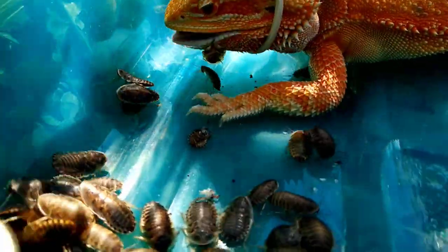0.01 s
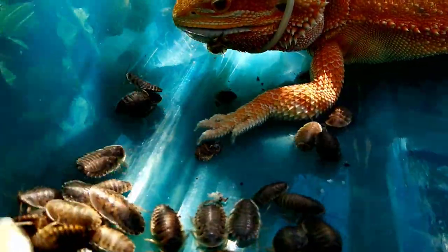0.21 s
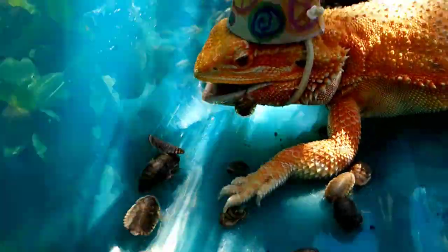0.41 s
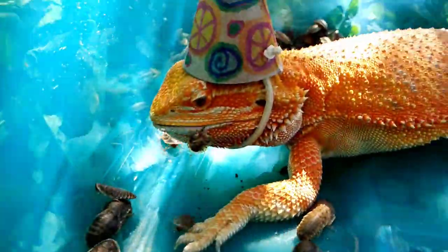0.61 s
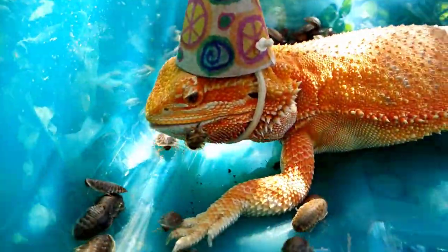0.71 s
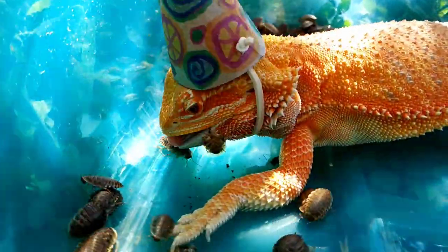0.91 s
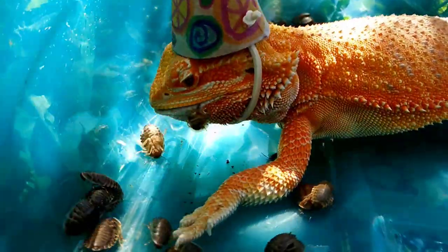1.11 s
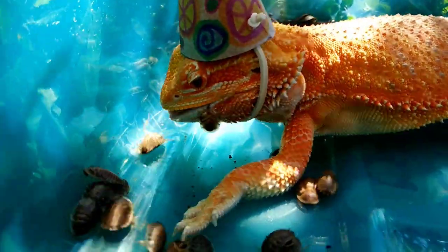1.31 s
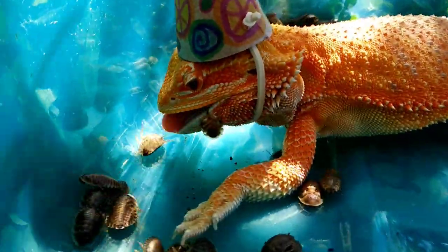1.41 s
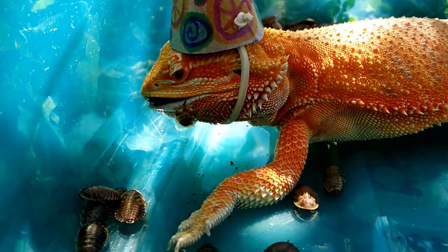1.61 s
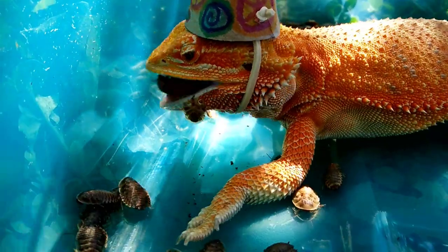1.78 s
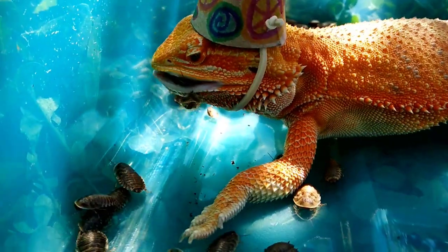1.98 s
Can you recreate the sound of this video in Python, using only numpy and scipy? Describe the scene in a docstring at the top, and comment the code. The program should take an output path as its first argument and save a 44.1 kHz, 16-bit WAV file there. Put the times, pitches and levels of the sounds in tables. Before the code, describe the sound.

A lizard crunches insects in a plastic tub: bright clicks, scrapes and dull knocks crowd together early, a near-silent lull, a shorter second cluster, then a faint rustle; close stereo microphone, quiet room with soft hiss.

```python
"""Two seconds in stereo, hand-held camera close over a plastic tub where a lizard eats insects in a quiet room.
Room hiss, low handling rumble and a faint rustle come first: coloured noise under drawn levels.
From 0.2 s soft scrapes (noise puffs), dull knocks (damped sines, mostly louder right) and bright ticks
(ringing snaps) crowd in until 0.75 s, with a brief hollow hum near 0.3 s and rubbing in mid-range noise.
A lull follows, a second cluster at 1.2 to 1.4 s, then a few knocks and a rustle rising at the end."""
import sys
import numpy as np
from scipy import signal
from scipy.fft import rfft, irfft, next_fast_len
from scipy.io import wavfile
from scipy.ndimage import map_coordinates

SR = 44100
rng = np.random.default_rng(int(sys.argv[2]) if len(sys.argv) > 2 else 0)


def bounce(signal):
    """Save signal as a 16-bit WAV file at the path given by the first command-line argument."""
    frames = np.transpose(np.atleast_2d(signal))
    limited = np.clip(frames, -1, 1)
    pcm = np.round(limited * 32767).astype(np.int16)
    wavfile.write(sys.argv[1], SR, pcm)


N = 88200

# In every table and setting, a left-right level above 0 dB is louder on the left.
# Level of the bass handling rumble: start_s, level_db
RUMBLE_LEVEL = [(0, -59), (.22, -62), (.3, -40.5), (.37, -55), (.46, -44.5), (.62, -47.5), (.76, -56.5),
                (.92, -59.5), (1.0, -63), (1.22, -62.5), (1.3, -48.5), (1.45, -60), (2, -58)]
# Level of the treble rustle: start_s, level_db
RUSTLE_LEVEL = [(0, -63.5), (.23, -68), (.24, -35), (.26, -43.5), (.31, -49.5), (.39, -63.5), (.5, -55.5),
                (.58, -56), (.68, -59.5), (.8, -68), (1.1, -70), (1.32, -66.5), (1.34, -56), (1.45, -64),
                (1.55, -70.5), (1.64, -57.5), (1.75, -70), (1.96, -64.5), (2, -52.5)]
# Level of the mid-range rubbing: start_s, level_db
SCUFF_LEVEL = [(0, -86), (.21, -68), (.24, -64), (.35, -61), (.42, -69.5), (.45, -43), (.48, -61.5),
               (.53, -45), (.6, -47.5), (.66, -41.5), (.7, -57.5), (.74, -44.5), (.78, -61.5), (.95, -81),
               (1.17, -66.5), (1.25, -62.5), (1.265, -45), (1.32, -55.5), (1.38, -64), (1.5, -75.5),
               (2, -70.5)]
# Relative colour of the room air: frequency_hz, density_db (per Hz)
ROOM_COLOUR = [(120, -45), (220, -4), (450, -3), (600, -5), (770, 3), (950, -9), (1700, -13.5), (3000, -11),
               (5300, -9.5), (6900, -9.5), (8000, -33), (8800, -22.5), (9800, -39.5)]
# Relative colour of the rumble: frequency_hz, density_db (per Hz)
BASS_COLOUR = [(25, -48.5), (50, -2), (86, 0.5), (150, -5.5), (200, -5.5), (350, -30), (600, -73.5)]
# Relative colour of the rustle: frequency_hz, density_db (per Hz)
TREBLE_COLOUR = [(900, -40), (1600, -20), (2600, -11), (4100, -6), (5200, -1), (6400, -7.5), (7300, -18.5),
                 (8000, -33), (8800, -42.5), (9800, -89)]
# Relative colour of the rubbing: frequency_hz, density_db (per Hz)
MIDDLE_COLOUR = [(100, -18), (250, 5.5), (500, 1.5), (1300, -2), (2200, -8), (3500, -13), (6000, -40)]
# Likeness of the two microphones in the noise layers: frequency_hz, correlation (-1 to 1)
LIKENESS = [(60, 0.73), (250, 0.8), (520, 0.59), (1100, 0.0052), (2200, -0.28), (9000, 0.12)]
# Soft scrapes: start_s, level_db (peak), centre_hz, left_right_db, t60_s (time to fall 60 dB)
SCRAPE_EVENTS = [(0.167, -48, 2840, 10, 0.09), (0.221, -40.5, 3060, 8.5, 0.072),
                 (.261, -37, 4600, 6, 0.025), (0.277, -38, 5040, 5, 0.055), (0.565, -34, 6800, 4.5, 0.018),
                 (0.736, -49, 2980, 10, .02), (1.173, -48.5, 3370, 10, 0.051),
                 (1.2591, -30, 2350, 0.5, .025), (1.424, -49.5, 5570, -19, 0.077),
                 (1.991, -43.5, 4600, -2, 0.051)]
# Dull knocks: start_s, level_db (peak), pitch_hz, left_right_db, decay_cycles (to fall 30 dB)
KNOCK_EVENTS = [(0.222, -50, 1380, 5, 55), (0.297, -42.5, 1380, -13, 6.3), (0.392, -36, 605, 17.5, 5.1),
                (.391, -26, 123.6, 2, 2.94), (0.444, -41, 418, -9, 6), (0.454, -34.5, 1340, 19, 0.49),
                (.448, -30.5, 105, -8, 0.86), (0.5213, -13, 1025, -57, 0.3), (0.521, -38.5, 213, 14, 1.2),
                (.585, -29, 542, -16, 2.1), (0.588, -32, 104, -23, 1.7), (0.6528, -27, 402, -7.5, 1.8),
                (0.7187, -16.5, 777, -6, 1.7), (0.7183, -24, 339, -4, 3.6), (1.205, -46.5, 683, 24, 6.1),
                (1.243, -42.5, 1220, -5, 2.5), (1.26, -33.5, 470, -15, 9.2),
                (1.3334, -21.5, 685, -19.5, 1.33), (1.3327, -29, 1540, -15.5, 1.5),
                (1.338, -37.5, 68.5, -13, 0.79), (1.655, -47, 85, -17, 2.2), (1.965, -37, 547, -27, 0.82)]
# Bright ticks: start_s, level_db (peak), centre_hz, left_right_db, width_ratio (one resonance's width over centre)
TICK_EVENTS = [(.2364, -23, 5600, 0, .3), (.2381, -28, 3300, 3, 1.4), (.246, -21, 5300, .5, .35),
               (.2502, -34, 4500, 3, .4), (.2978, -24, 5200, 5, .14), (.4536, -27, 3300, -12, .9),
               (.457, -32, 5060, 24, .5), (.5226, -30, 4280, -39, .8), (.6535, -24, 5200, 15, .6),
               (.6546, -23, 3300, 10, .8), (.7192, -29, 6300, 15, .3), (.72, -35, 3000, 10, .4),
               (.912, -45, 6070, -11, .2), (1.1095, -47, 4400, 11.5, .3), (1.1475, -48, 5850, -21, .12),
               (1.278, -42, 2500, -5, .6), (1.3338, -24, 4500, -15, .4), (1.3815, -38, 5860, -26, .15)]

ROOM_DB, ROOM_LEFT_RIGHT_DB = -63.5, -0.5
RUMBLE_LEFT_RIGHT_DB, SCUFF_LEFT_RIGHT_DB = -6.0, -11
GRAINS_PER_S, GRAIN_SPREAD_DB = 900, 4  # on each side; scatter of the grain levels
RUSTLE_GRAIN_DB, SCUFF_GRAIN_DB = 5, 4  # grains against the noise under them
SCRAPE_RISE_S, SCRAPE_WIDTH_RATIO = 0.00082, 0.56  # time constant of the start; one resonance's width over centre
KNOCK_LEFT_LAG_S, TICK_RIGHT_LAG_S = 0.00064, 0.000412  # late arrival at one microphone
ONSET_POWER = 3.2  # how softly a knock grows over its first cycle
SAG_RATIO, SAG_S = 0.6, 0.012  # a deep knock starts this share sharp and settles with this time constant
CRACK_DB, CRACK_T60_S = -17, 0.006  # splinters after the blow
TAIL_DB, TAIL_T60_S = -32, 0.04  # longer scatter after the blow
BROAD_DB = -26  # share of a tick that skips its own resonance
SWELL_HZ, SWELL_WIDTH_HZ, SWELL_DB = 790, 150, -58
PORT_HZ, PORT_WIDTH_HZ, PORT_DB = 4000, 190, 4.5  # ring of the microphone port
ROLLOFF_HZ, SHELF_DB = 6680, -15  # steep dulling of ticks and scrapes, and the share added at all frequencies
LOW_CUT_HZ, TOP_HZ = 58, 9850


def amp(db):
    """Amplitude ratio of a level in dB."""
    return 10 ** (np.asarray(db) / 20)


def unit(x):
    """The signal scaled to rms 1."""
    return x / np.sqrt(np.mean(x ** 2) + 1e-20)


def along(points, hz):
    """Values read between (Hz, value) points on a log frequency axis."""
    f, v = np.transpose(points)
    return np.interp(np.log(hz + 1), np.log(f + 1), v)


def level_curve(rows):
    """Gain for each sample from (time, dB) points joined in dB."""
    start_s, level_db = np.transpose(rows)
    return amp(np.interp(np.arange(N) / SR, start_s, level_db))


def wobble(rate):
    """A smooth random curve with this many knots a second."""
    knots = rng.standard_normal(int(N * rate / SR) + 4)
    return map_coordinates(knots, [np.arange(N) * rate / SR])


def noise():
    """Unrelated white noise for the two microphones."""
    return rng.standard_normal((2, N))


def filtered(x, response):
    """The signal shaped by a complex response of frequency."""
    n = x.shape[-1]
    m = next_fast_len(n + 4096)
    return irfft(rfft(x, m) * response(np.fft.rfftfreq(m, 1 / SR)), m)[..., :n]


def delays(f, left_s, right_s):
    """Phase response that delays each side by its own time."""
    return np.exp(-2j * np.pi * f * np.array([[left_s], [right_s]]))


def peak(f, hz, width_hz):
    """A causal resonance with gain 1 at its centre."""
    return 1j * f * width_hz / (hz * hz - f * f + 1j * f * width_hz)


def port(f):
    """The microphone port's ring and the dull top, heard on ticks and scrapes."""
    ring = 1 + amp(PORT_DB) * peak(f, PORT_HZ, PORT_WIDTH_HZ)
    dull_top = amp(SHELF_DB) + 1 / (1 + (f / ROLLOFF_HZ) ** 30)
    return ring * dull_top


def sides(left_right_db):
    """Left and right gains, as a column, for a level difference; their mean is 1."""
    gains = amp(np.array([left_right_db / 2, -left_right_db / 2]))
    return (gains / gains.mean())[:, None]


def place(out, sound, start, level_db, left_right_db):
    """Add a sound at a sample, its highest peak set to 1 before level and side gains."""
    gain = amp(level_db) * sides(left_right_db)
    out[:, start:][:, :sound.shape[-1]] += gain * sound / np.abs(sound).max()


def rush(colour, source):
    """Two unrelated signals coloured and made partly alike, rms 1."""
    def response(hz):
        # the angle between the two sides sets their correlation
        half_angle = np.arccos(np.clip(along(LIKENESS, hz), -1, 1)) / 2
        return amp(along(colour, hz)) * [np.cos(half_angle), np.sin(half_angle)]

    mid, side = filtered(source, response)
    return unit(np.array([mid + side, mid - side]))


def grains(t60):
    """Tiny noise bursts at random times, each dying exponentially, rms 1."""
    struck = rng.random((2, N)) < GRAINS_PER_S / SR
    hits = struck * amp(GRAIN_SPREAD_DB * noise())
    fade = amp(-60 * np.arange(SR // 50) / SR / t60)
    envelope = signal.fftconvolve(hits, fade[None], axes=1)[:, :N]
    return unit(envelope * noise())


def room_air():
    """Air of the room: coloured noise whose level drifts unevenly."""
    drift = amp(2.4 * wobble(12.7))
    return amp(ROOM_DB) * sides(ROOM_LEFT_RIGHT_DB) * rush(ROOM_COLOUR, drift * noise())


def rumble():
    """Lumpy handling rumble: bass noise with a wandering level, louder on the right."""
    lumps = amp(2.35 * wobble(13.75))
    bass = unit(lumps * rush(BASS_COLOUR, noise()))
    return level_curve(RUMBLE_LEVEL) * sides(RUMBLE_LEFT_RIGHT_DB) * bass


def rustle():
    """Treble rustle: hiss with tiny random grains."""
    hiss = noise() * amp(1.15 * wobble(31.0))
    source = hiss + amp(RUSTLE_GRAIN_DB) * grains(0.014)
    return level_curve(RUSTLE_LEVEL) * rush(TREBLE_COLOUR, source)


def scuff():
    """Gritty rubbing on the body: uneven mid-range noise and grains, louder on the right."""
    rubbing = amp(1.2 * wobble(30)) * noise()
    source = rubbing + amp(SCUFF_GRAIN_DB) * grains(0.01)
    return level_curve(SCUFF_LEVEL) * sides(SCUFF_LEFT_RIGHT_DB) * rush(MIDDLE_COLOUR, source)


def scrapes():
    """Resonant noise that starts softly and dies fast, different at each microphone."""
    out, t = np.zeros((2, N + SR)), np.arange(SR // 10) / SR
    for start_s, level_db, hz, left_right_db, t60 in SCRAPE_EVENTS:
        crackle = np.sign(rng.standard_normal((2, len(t))))
        puff = crackle * (1 - np.exp(-t / SCRAPE_RISE_S)) * amp(-60 * t / t60)
        puff = filtered(puff, lambda f: peak(f, hz, SCRAPE_WIDTH_RATIO * hz) ** 2 * port(f))
        place(out, puff, round(start_s * SR), level_db, left_right_db)
    return out[:, :N]


def knocks():
    """Damped swings of the body, mostly few and heavily damped, reaching the left microphone later."""
    out, t = np.zeros((2, N + SR)), np.arange(SR // 5) / SR
    for start_s, level_db, hz, left_right_db, cycles in KNOCK_EVENTS:
        # only knocks under 200 Hz sag in pitch
        sag = SAG_RATIO * SAG_S * (1 - np.exp(-t / SAG_S)) * (hz < 200)
        onset = np.minimum(t * hz, 1) ** ONSET_POWER
        decay = amp(-30 * t * hz / cycles)
        swing = np.sin(2 * np.pi * hz * (t + sag)) * onset * decay
        place(out, swing, round(start_s * SR), level_db, left_right_db)
    return filtered(out[:, :N], lambda f: delays(f, KNOCK_LEFT_LAG_S, 0))


def ticks():
    """A short snap with a scattered tail, ringing at its own pitch and later on the right."""
    lead = 128  # samples kept ahead of the snap for the filter's early ripple
    out, t = np.zeros((2, N + SR)), np.arange(SR // 10) / SR
    for start_s, level_db, hz, left_right_db, width_ratio in TICK_EVENTS:
        # the splinters are shared; each side has its own tail
        splinters, *tail = np.sign(rng.standard_normal((3, len(t))))
        crack = splinters * amp(CRACK_DB - 60 * t / CRACK_T60_S)
        scatter = np.array(tail) * amp(TAIL_DB - 60 * t / TAIL_T60_S)
        burst = np.roll((t == 0) + crack + scatter, lead, axis=1)

        def response(f):
            ring = peak(f, hz, width_ratio * hz) ** 2 + amp(BROAD_DB)
            return ring * port(f) * delays(f, 0, TICK_RIGHT_LAG_S)

        place(out, filtered(burst, response), round(start_s * SR) - lead, level_db, left_right_db)
    return out[:, :N]


def hollow_swell():
    """One brief hollow hum: noise through a narrow resonance, equal on both sides."""
    hum = unit(filtered(rng.standard_normal(N), lambda f: peak(f, SWELL_HZ, SWELL_WIDTH_HZ) ** 2))
    gate = np.interp(np.arange(N) / SR, [0.255, 0.2669, 0.32, 0.36], [0, 1, 1, 0])
    return amp(SWELL_DB) * gate * hum


def scene():
    """All layers at the two microphones, summed."""
    events = ticks() + scrapes() + knocks()
    handling = rumble() + scuff()
    return events + handling + rustle() + hollow_swell() + room_air()


def record(dry):
    """Bass cut, band limit, and a trace of converter noise."""
    def band(hz):
        bass_cut = (1j * hz / (LOW_CUT_HZ + 1j * hz)) ** 2
        return bass_cut * (hz < TOP_HZ)

    return filtered(dry, band) + amp(-103) * rng.standard_normal(dry.shape)


dry = scene()
out = record(dry)
bounce(out)
```